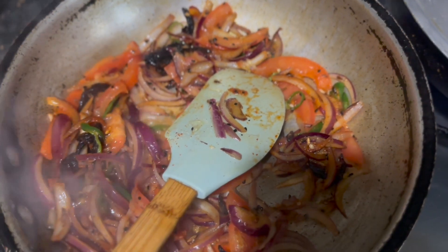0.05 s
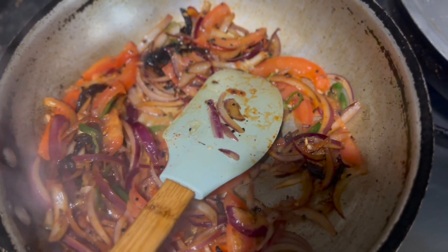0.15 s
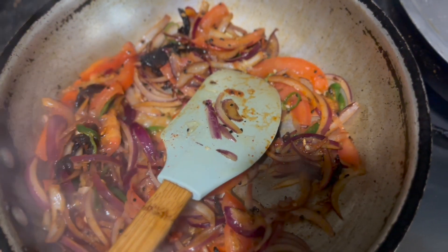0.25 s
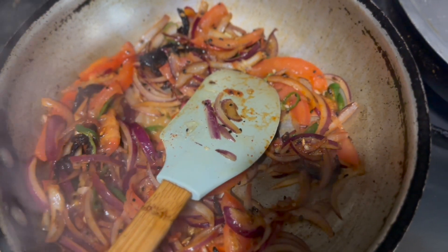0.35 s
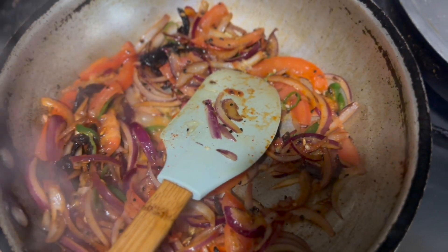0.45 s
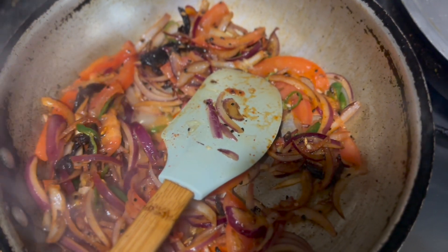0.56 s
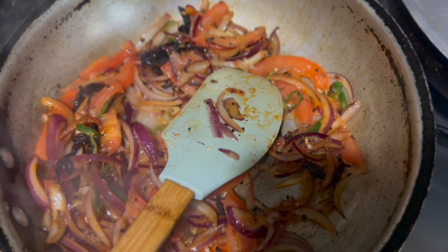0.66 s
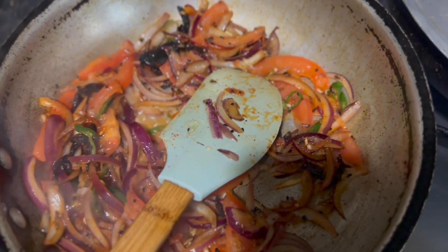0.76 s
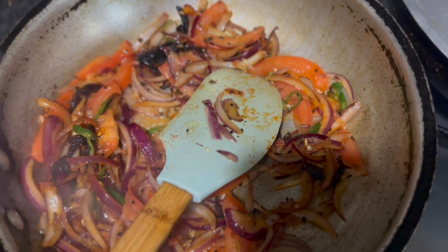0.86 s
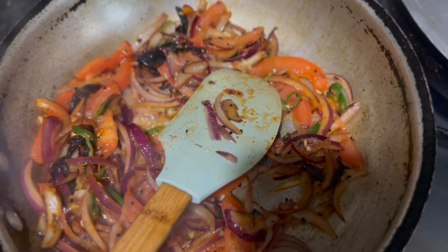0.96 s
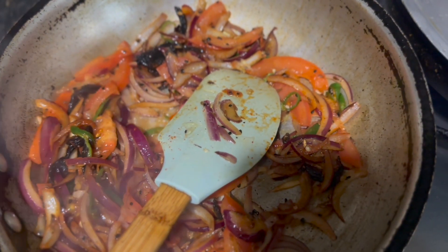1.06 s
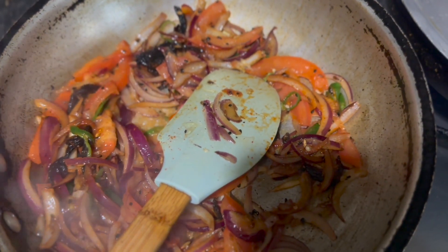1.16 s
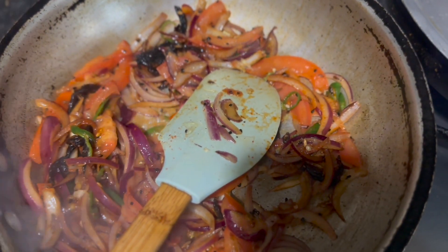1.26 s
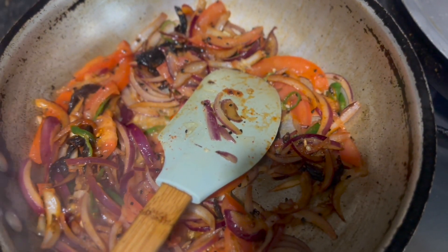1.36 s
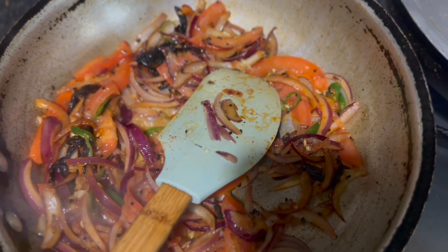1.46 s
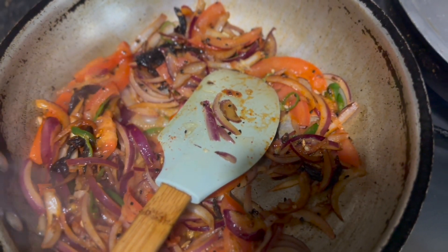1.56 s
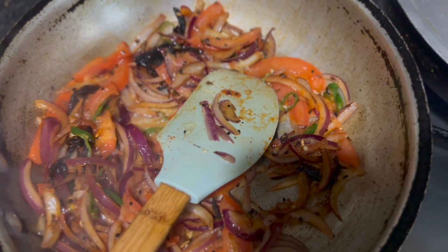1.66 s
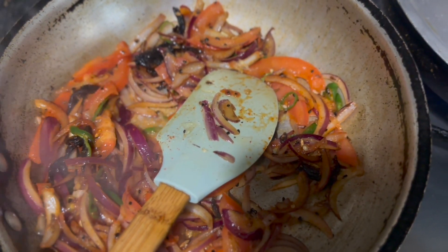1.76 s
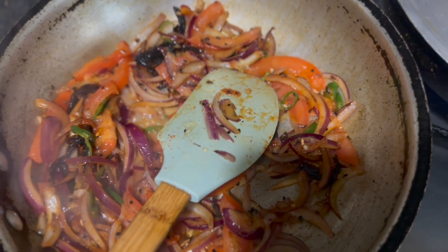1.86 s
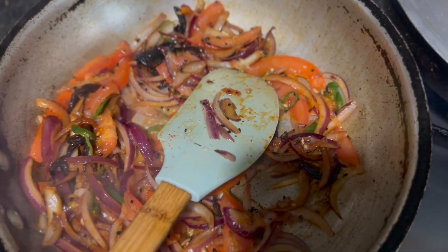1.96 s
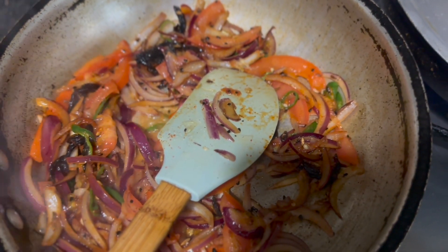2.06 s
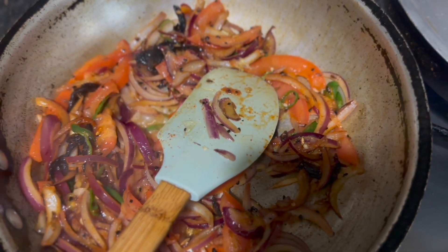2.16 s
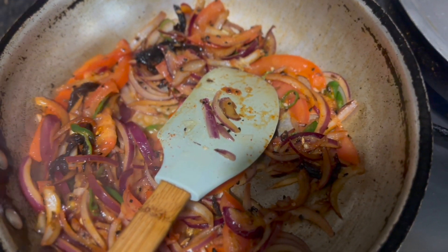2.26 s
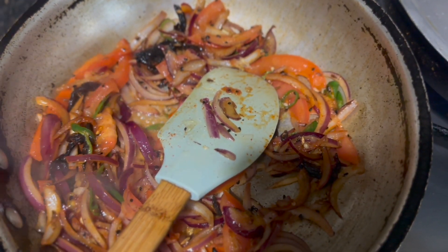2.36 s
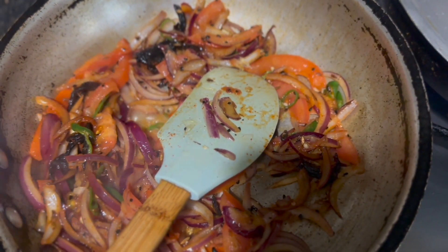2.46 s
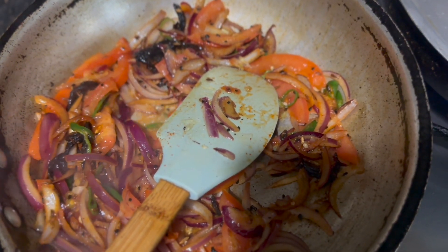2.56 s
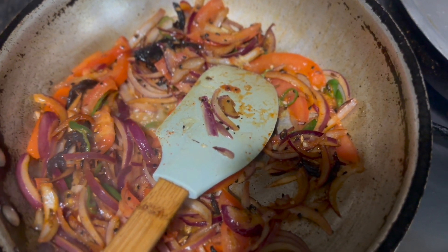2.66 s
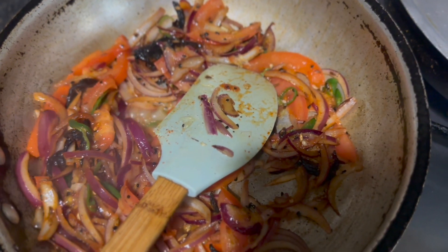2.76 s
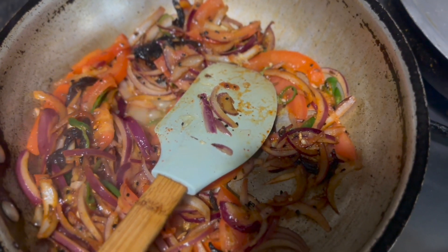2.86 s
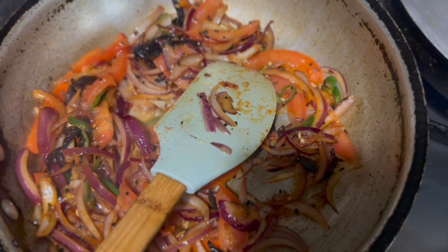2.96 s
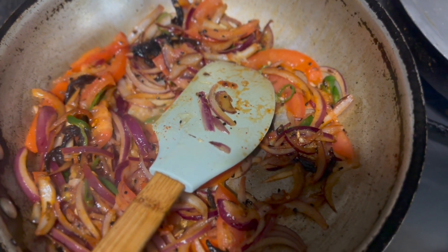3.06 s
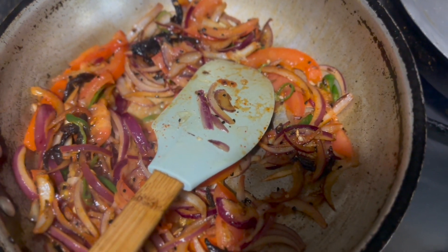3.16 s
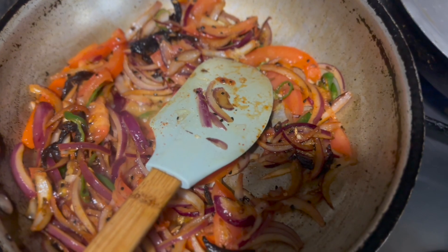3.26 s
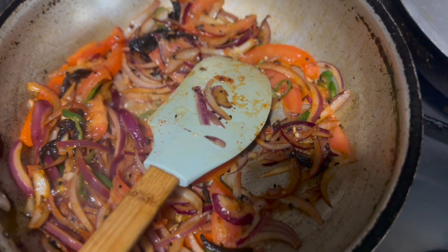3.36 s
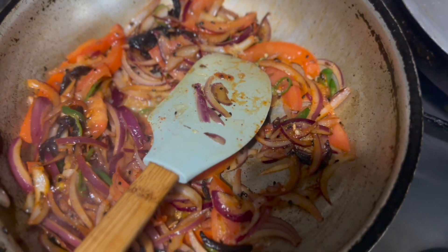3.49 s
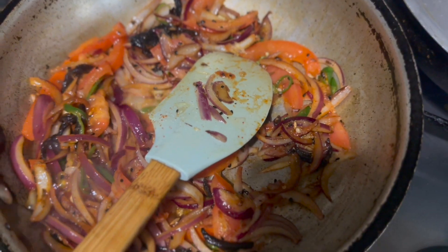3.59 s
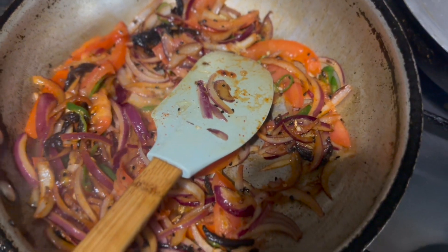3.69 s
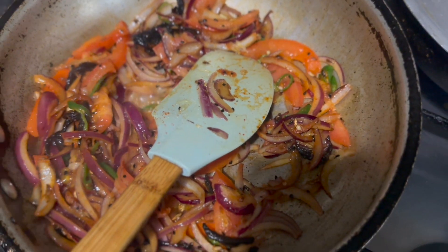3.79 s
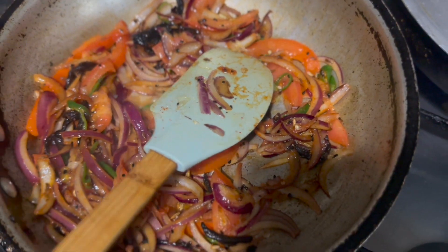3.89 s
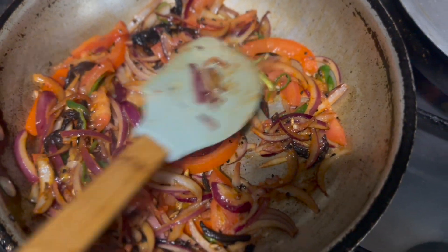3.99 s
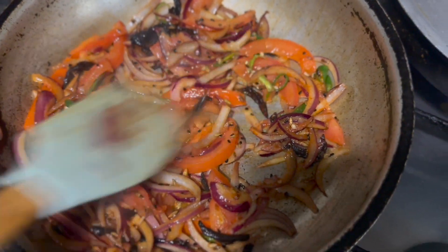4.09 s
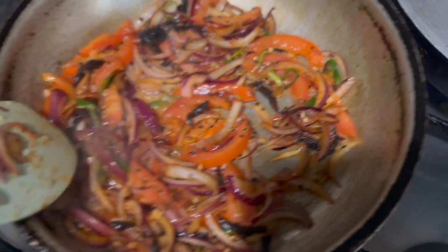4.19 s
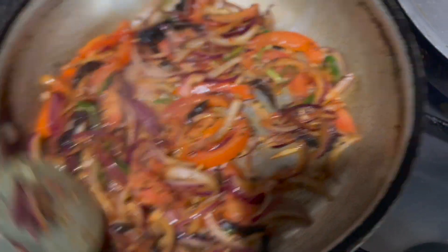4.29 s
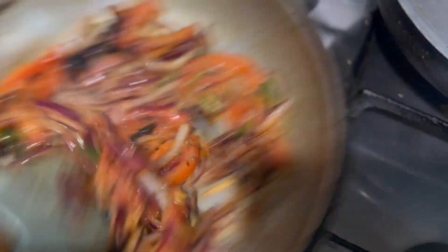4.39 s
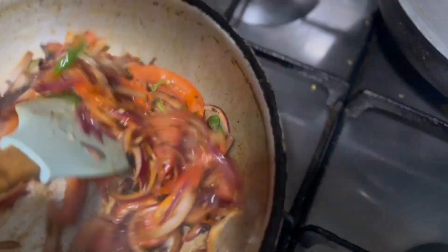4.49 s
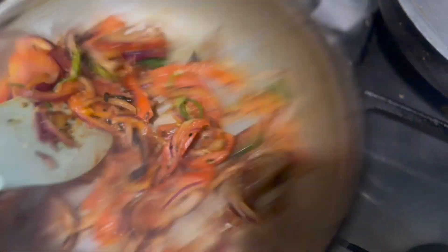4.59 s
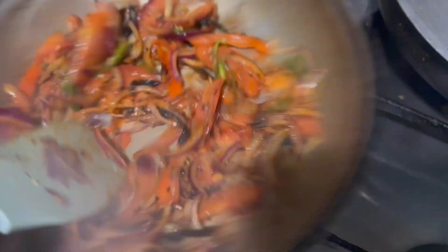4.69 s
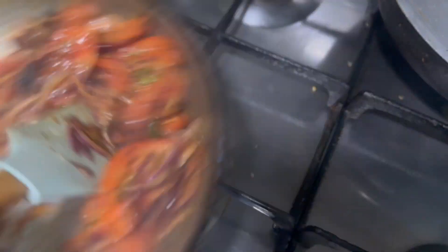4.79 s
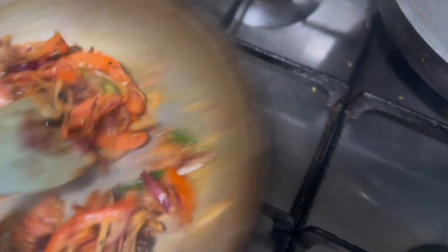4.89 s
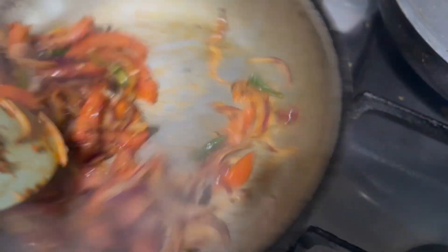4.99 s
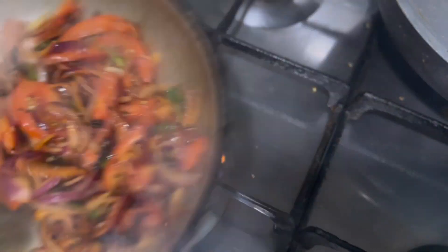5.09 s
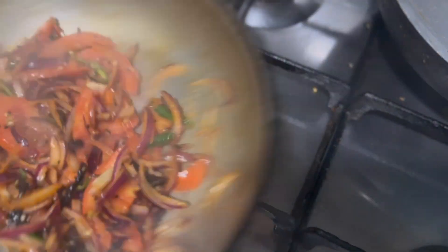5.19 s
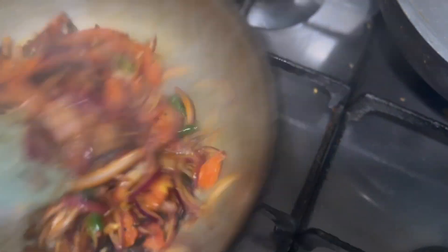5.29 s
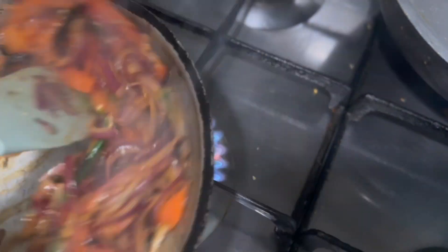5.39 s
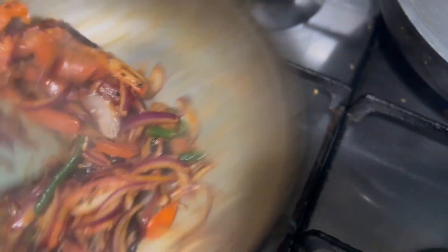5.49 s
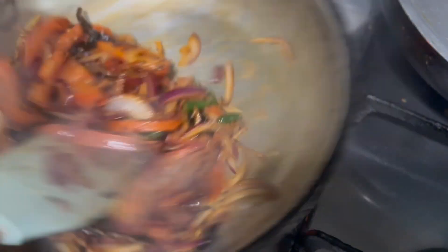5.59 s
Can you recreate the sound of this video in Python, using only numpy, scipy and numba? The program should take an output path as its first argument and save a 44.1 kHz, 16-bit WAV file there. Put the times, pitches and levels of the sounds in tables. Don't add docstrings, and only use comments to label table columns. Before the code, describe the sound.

Close, bright frying fizz with small cracking spits, faint handling bumps, and late on a burst of spatula scraping, knocking and pan rattling.

```python
import sys
import numpy as np
from scipy import signal
from scipy.fft import rfft, irfft
from scipy.io import wavfile
from scipy.ndimage import uniform_filter1d
from numba import njit

SR = 44100
rng = np.random.default_rng(int(sys.argv[2]) if len(sys.argv) > 2 else 0)


def to_wav(s):
    ch = np.atleast_2d(s).T
    pcm = np.round(np.clip(ch, -1, 1) * 32767)
    wavfile.write(sys.argv[1], SR, pcm.astype(np.int16))


def gain_from_db(level_db):
    decades = np.asarray(level_db, float) / 20
    return 10 ** decades


N = 248724
TIME = np.arange(N) / SR
HZ = np.fft.rfftfreq(N, 1 / SR)

# pitch_hz, level_db (per Hz), left_minus_right_db, shared_by_ports (0-1),
# left_lead_rad (by way of the pan wall)
FAT_COLOUR = [(663, -19, 19, 0.3, 1.1), (770, -2.5, 3.5, 1, 0.11), (1120, -6.5, -0.5, 0.65, 0.31),
              (2034, -3, -0.5, 0, 0.93), (2220, -2.5, -3, 0.56, 2.26), (3290, -0.5, -0.5, 0.35, 2.9),
              (4130, -2, 1.5, 0.47, 5.3), (4970, -1, 1.5, 0.28, 6.8), (6630, -4.5, 3.5, 0.02, 10.6),
              (7740, -4, 5.5, 0.7, 10.9), (8400, -3, 2.5, 1, 7.8), (11000, -1.5, -2, 1, 5.8),
              (12500, -6, 1, 1, 7.8), (16500, -12, -1, 1, 9.5)]
# start_s, boil_db, left_minus_right_db
BOIL_COURSE = [(0, -34.5, 3), (.8, -34.5, 3.5), (2.7, -35, 3), (3.6, -35.5, 5), (4.25, -34, 3.5),
               (4.43, -32, 7.5), (4.464, -29.5, 7), (4.616, -28.5, 8.5), (4.74, -26, 7), (4.76, -30.5, 13),
               (4.836, -29.5, 7.5), (4.896, -25, 9), (5.002, -29.5, 8.5), (5.086, -28, 10.5),
               (5.134, -33, 9.5), (5.178, -29.5, 8.5), (5.36, -31.5, 7.5), (5.56, -29, 9.5)]
# peak_s, extra_spray_db, rise_s (per 20 dB), fall_s (per 20 dB)
JUICE_SPURTS = [
    (4.24, 0, .1, .08),
    (4.46, 4, .04, 0),
    (4.555, 6, 0.3, 0.2),
    (4.785, 5, -1, 0.3),
    (5.18, 4, 1, 1.5),
    (5.62, 2, .5, -5),
]
# pitch_hz, width_hz, level_db
BOWL_MODES = [(940, 220, 5.5), (1310, 25, 10.5), (1391, 36, 14.5), (1534, 81, 8.5), (1785, 30, 10),
              (2096, 48, 9), (2797, 78, 3.5), (3705, 27, 9.5)]
# pitch_hz, width_hz, level_db
FLOOR_MODES = [(290, 41, 1.5), (340, 100, 0), (479, 24, 2.5), (560, 105, -0.5), (691, 45, 5.5),
               (776, 79, 0.5), (1020, 75, -2.5), (1150, 210, -23)]
# pitch_hz, width_hz, level_db
RIM_MODES = [(1344, 40, -1.5), (1550, 47, -7), (1780, 51, -5), (2310, 92, 4), (3100, 90, -7.5),
             (3710, 28, 1.5), (4470, 63, -3)]
# peak_s, pressure_db, brightness_db, rise_s (per 20 dB), fall_s (per 20 dB)
STROKE_EVENTS = [(4.38, -43, 9, -0.2, 0.4), (4.415, -30.5, -0.5, 0.08, 0.06), (4.58, -40, -11, 0.5, -5.5),
                 (4.61, -25.5, -1, .01, 0.2), (4.65, -30, 0.5, 0.1, 0.2), (4.72, -33, 4, .03, 0.2),
                 (4.798, -29, 1.5, 0.1, 0.2), (4.947, -26.5, 0.5, 0.11, .1), (5.106, -26, 2, 0, -0.36),
                 (5.162, -39.5, 3.5, 0.2, 0.1), (5.195, -39, -13, -0.5, 1),
                 (5.23, -29.5, -3.5, 0.25, -0.24), (5.32, -35, 2, -0.14, .1),
                 (5.345, -30, 4.5, -0.03, 0.17), (5.372, -29, 5.5, 0.05, 0.06), (5.46, -34, 6.5, 0, -0.07),
                 (5.496, -34.5, 8.5, 0.07, 0.1)]
# pitch_hz, then rows of peak_s, level_db, fall_s (per 20 dB)
WALL_SONGS = [
    (1756, [(4.604, -38, 1), (4.764, -36, .3), (4.81, -30, -2), (4.905, -26, .04), (5.11, -27, -1.1), (5.18, -34, -1.2), (5.325, -36, 0.3), (5.385, -32, .03), (5.475, -31.5, 0.2)]),
    (2310, [(4.604, -42, 0), (4.66, -39, .05), (4.822, -29, -0.26), (4.91, -35, 0.4), (5.11, -38, -1.5), (5.18, -47, -2), (5.368, -38, 0), (5.456, -38, 0)]),
]
# start_s, level_db (peak), pitch_hz, t60_s
FLOOR_KNOCKS = [(4.325, -43, 970, 0.028), (4.37, -45, 670, 0.035), (4.403, -21, 678, 0.087),
                (4.46, -25.5, 755, 0.039), (4.565, -23.5, 500, 0.07), (4.6072, -9.5, 697, 0.025),
                (4.611, -31, 483, 0.039), (4.95, -18, 484, 0.077), (4.96, -19.5, 790, 0.021),
                (4.707, -24, 714, 0.14), (4.765, -17.5, 487, 0.012), (4.789, -15.5, 710, 0.017),
                (4.886, -22, 745, 0.029), (5.101, -20, 463, 0.04), (5.161, -23, 696, 0.032),
                (5.276, -35, 407, 0.035), (5.312, -16.5, 560, 0.033), (5.338, -19, 620, 0.047),
                (5.453, -22, 670, 0.042), (5.485, -19.5, 500, 0.045), (5.55, -23.5, 1150, 0.032)]
# start_s, level_db (peak), pitch_hz, t60_s
RIM_TICKS = [(4.407, -38, 3640, 0.025), (4.6069, -24, 3710, 0.025), (4.6433, -13, 3680, 0.025),
             (4.6568, -9, 3750, 0.017), (4.7198, -12.5, 1570, 0.013), (4.7763, -18, 3100, 0.03),
             (4.7894, -26, 2340, 0.025), (4.806, -17, 2310, 0.072), (4.8966, -18, 1800, 0.029),
             (4.9744, -21, 1970, 0.022), (5.0994, -17, 1780, 0.023), (5.1137, -21, 1690, 0.025),
             (5.1696, -25, 3440, 0.025), (5.1907, -17.5, 3100, 0.02), (5.3183, -29, 1670, 0.027),
             (5.3494, -32, 3100, 0.025), (5.365, -29, 1730, 0.031), (5.4586, -20, 1710, 0.028),
             (5.477, -19, 2500, 0.021), (5.5483, -16.5, 1480, 0.028)]
# start_s, level_db (peak), pitch_hz, t60_s
RIM_CLINKS = [
    (4.6069, -20, 3710, 0.018),
    (4.6568, -4.5, 4430, 0.02),
    (4.7184, -11.5, 4970, 0.013),
    (5.5474, -14, 4470, 0.02),
    (4.608, -15, 2800, 0.023),
    (4.658, -27, 4470, .03),
    (5.549, -16, 2640, 0.032),
]
# start_s, level_db (peak), pitch_hz, t60_s
GRATE_THUDS = [(0.449, -37, 185, 0.11), (0.531, -28.5, 189, 0.095), (0.546, -33, 140, 0.065),
               (0.553, -28.5, 98, 0.062), (.585, -38, 95, 0.14), (0.889, -37, 407, 0.09),
               (.9, -41, 467, .1), (.893, -43, 170, .08), (2.099, -36.5, 181, 0.14),
               (2.172, -33.5, 88.8, 0.19), (2.469, -34, 123, 0.09), (2.56, -39.5, 104, 0.19),
               (3.265, -34.5, 115, 0.11), (3.725, -35, 102, 0.1), (4.01, -34, 121, 0.11),
               (4.214, -32, 266, 0.05), (4.355, -27, 115, .06), (4.412, -19, 129, 0.1),
               (4.62, -9.5, 148, 0.045), (4.667, -11, 89.5, 0.047), (4.724, -13, 108, 0.077),
               (4.898, -17.5, 86.5, 0.065), (5.11, -11.5, 113, 0.035), (5.319, -21, 127, 0.07),
               (5.386, -16.5, 141, 0.091), (5.468, -19.5, 107, 0.076), (5.497, -17.5, 155, 0.17),
               (5.561, -9.5, 116, 0.064)]
# peak_s, level_db (peak), rocking_pitch_hz, fall_s (per 20 dB)
HAND_NUDGES = [(0, -42, 112, .22), (.47, -42.5, 87, 0), (.55, -29, 110, 0), (.83, -55, 117, 1.5),
               (.91, -50, 94, -1), (1.03, -46, 82, -5.5), (1.3, -57, 96, 1), (1.51, -42, 95, 0.04),
               (1.74, -45, 91, -1), (1.99, -47, 98, -3), (2.09, -44, 115, 0.8), (2.19, -40, 85, 0.35),
               (2.48, -43.5, 112, -0.3), (2.58, -47, 104, -1.5), (2.68, -51, 90, 1.5),
               (2.95, -53.5, 104, 10), (3.27, -36, 115, 0), (3.34, -40, 103, 0.2), (3.47, -47.5, 106, 0.5),
               (3.66, -43, 98, -0.5), (3.82, -37.5, 98, -1.2), (3.89, -45.5, 97, 3), (4.02, -41, 89, 0.5),
               (4.14, -48, 96, 2.5)]
# peak_s, level_db (peak), rocking_pitch_hz, rise_s (per 20 dB), fall_s (per 20 dB)
PAN_SHOVES = [(4.366, -27.5, 113, .07, -0.5), (4.388, -26.5, 108, 0.01, .06), (4.437, -26, 125, 0.03, .08),
              (4.478, -27.5, 110, 0.08, .07), (4.528, -35, 105, 0, 0), (4.578, -26.5, 100, 0, 0.5),
              (4.648, -21, 120, 0, 0.2), (4.702, -23, 105, 0.04, 0), (4.768, -22.5, 103, 0.13, 0.2),
              (4.8, -25, 120, 0.06, 0.05), (4.836, -20.5, 128, 0.12, .04), (4.914, -24, 112, .06, 0.24),
              (4.95, -24.5, 126, 0.12, .12), (5.015, -24.5, 120, .04, -0.1), (5.045, -33.5, 110, 0.4, .06),
              (5.145, -20.5, 125, .1, -0.2), (5.188, -24.5, 152, 0.16, -0.1), (5.21, -23, 136, -0.02, .12),
              (5.24, -22.5, 153, 0.22, 0), (5.29, -38, 120, .1, -1), (5.352, -22.5, 140, .06, 0.2),
              (5.372, -20, 120, 0.03, -0.3), (5.405, -23, 130, .1, 0), (5.525, -23.5, 145, 0.34, 0.3),
              (5.59, -23.5, 124, .1, 0), (5.612, -27, 115, -0.4, -0.8)]
# pitch_hz, level_db (per Hz)
FLAME_COLOUR = [(15, -39), (25, -22), (43, -4.5), (98, -1.5), (211, -17.5), (254, -12.5), (302, -9.5),
                (333, -7.5), (379, -8.5), (632, -14), (750, -15.5), (980, -35), (1650, -120)]

TOP_HZ = 15800
EVENNESS = 0.57


def sizzle():
    boil_db, pan_db = curves(BOIL_COURSE)
    stirred_db = boil_db - boil_db[0]
    squeeze = np.tanh(gain_from_db(glide(pressure()[1], 0.033) + 35.5))
    spread_out = np.clip((TIME - 4.55) / .5, 0, 1)
    drying_db = -0.48 * TIME
    splutter_db = boil_db[0] - 1.5 + drying_db + 0.79 * stirred_db + 2.5 * squeeze + 1.2 * spread_out
    spurt_db = swells(*np.transpose(JUICE_SPURTS), floor_db=-0.5)[0]
    spray_db = boil_db[0] + 0.9 + 0.92 * stirred_db + 0.68 * walk(9) + spurt_db

    small = np.sqrt(1 / (1 + (6800 / (HZ + 1)) ** 7.1))
    tiny = np.sqrt(1 / (1 + (13300 / (HZ + 1)) ** 43))
    large = np.sqrt(1 - small ** 2) / np.sqrt(1 + (700 / (HZ + 1)) ** 6)
    straight = -2 * np.pi * HZ * 3.72 / SR
    by_wall = on_log_hz(*np.array(FAT_COLOUR)[:, [0, 4]].T)

    fizz = fat(small * np.sqrt(1 - tiny ** 2), straight, share=.6, spread_db=1.0, flicker_db=0.51)
    spray = fat(tiny * (HZ < TOP_HZ), straight, share=.7, spread_db=0.74, flicker_db=.35)
    splutter = fat(large, by_wall, share=.3, spread_db=0.5, flicker_db=0.48)
    bowl = fat(large * modes(BOWL_MODES), by_wall, share=.03, spread_db=2.56, flicker_db=0.96)
    lean_db = np.array([pan_db, -pan_db]) / 2
    bowl_db = -40.5 + 0.46 * np.minimum(splutter_db - splutter_db[0], 0) + np.array([[1.8], [-1.8]])
    bubbles = fizz * gain_from_db(boil_db + 6.0) + spray * gain_from_db(spray_db)
    return bubbles + splutter * gain_from_db(splutter_db + 5.0 + lean_db) + bowl * gain_from_db(bowl_db)


def fat(colour, lead, share, spread_db, flicker_db):
    hz, db, pan_db, common, _ = np.transpose(FAT_COLOUR)
    db, pan_db = on_log_hz(hz, db), on_log_hz(hz, pan_db)
    common = on_log_hz(hz, np.clip(common, 0, .7))
    boil = gain_from_db(flicker_db * walk(40))
    both, left, right = (rfft(boil * bursts(share, spread_db)) for _ in range(3))
    left = np.sqrt(common) * both * np.exp(1j * lead) + np.sqrt(1 - common) * left
    right = np.sqrt(common) * both + np.sqrt(1 - common) * right
    ports = np.array([left * gain_from_db(pan_db / 2), right * gain_from_db(-pan_db / 2)])
    return unit(irfft(colour * gain_from_db(db) * ports, N))


def spits():
    boil_db = curves(BOIL_COURSE)[0]
    droplets = through(bursts(share=.001, spread_db=1.0), modes([(9500, 9000, 0)]))
    return place(unit(droplets) * gain_from_db(-47 + boil_db - boil_db[0]), 1.5, .4, 6000)


def spatula():
    low_db, high_db = pressure()
    knocks = rings(FLOOR_KNOCKS, rise=0.07, late=0.36) * gain_from_db(-1.0)
    ticks = rings([*RIM_TICKS, *RIM_CLINKS], rise=0.42, late=.6) * gain_from_db(-5.5)
    bounce = np.roll(envelope(knocks, 0.0217), -int(0.0079 * SR))
    landed = np.clip((TIME - STROKE_EVENTS[0][0] + .13) / 0.081, 0, 1)
    down = landed / (1 + (1.04 * bounce / gain_from_db(high_db)) ** 2)

    slips = bursts(share=.04, spread_db=1.4) * gain_from_db(1.9 * walk(45))
    blows = cracks(FLOOR_KNOCKS, 0.0068)
    low = shaken(FLOOR_MODES[:3], slips, down * gain_from_db(low_db), blows * gain_from_db(-8.0))
    high = shaken(FLOOR_MODES[3:], slips, down * gain_from_db(high_db - 2.4), blows * gain_from_db(-7.0))
    rim = shaken(RIM_MODES, slips, down * gain_from_db(high_db - 10), cracks(RIM_TICKS, 0.0036) * gain_from_db(-10.5))
    scuff = svf(blows * gain_from_db(-6.0) + slips * down * gain_from_db(high_db - 6), steady(2500.0), 0.35)
    bright = rim + ticks + singing(slips) + scuff
    return place(low, 1.5, 0.48, 600) + place(high + knocks, 6.2, 1.1, 540) + place(bright, 5.1, 1.0, 1200)


def singing(slips):
    song = np.zeros(N)
    for hz, rows in WALL_SONGS:
        s, db, fall = np.transpose(rows)
        tone = evened(through(slips, modes([(hz, 42, 0)])), 0.0071, EVENNESS)
        song += tone * gain_from_db(swells(s, db - 3.0, 0.048, fall)[0])
    return song


def pressure():
    s, db, bright_db, rise, fall = np.transpose(STROKE_EVENTS)
    return swells(s, db, rise, fall)[0], swells(s, db + bright_db, rise, fall * 0.61)[0]


def shaken(table, slips, touch, blows):
    response = modes(table)
    dragged = through(slips, response)
    struck = through(blows, response) / np.std(dragged)
    return evened(dragged, 0.0115, EVENNESS) * glide(touch, 0.0071) + struck


def rumble():
    nudges = np.insert(HAND_NUDGES, 3, 0.059, axis=1)
    s, db, hz, rise, fall = np.vstack([nudges, PAN_SHOVES]).T
    level_db, which = swells(s, db, rise, fall, floor_db=-66)
    hz = glide(hz[which], 0.028)
    pushes = rng.standard_normal(N) * gain_from_db(1.6 * walk(25.3))
    rocking = evened(svf(svf(pushes, hz, 7.6), hz, 1.0), 0.0098, EVENNESS)
    boom = evened(svf(svf(pushes, steady(72.0), 1.2), steady(72.0), 1.2), 0.026, EVENNESS)

    thuds = rings(GRATE_THUDS, rise=0.34, late=0.36)
    near_thud = np.roll(envelope(thuds, 0.025), -int(0.0083 * SR))
    free = gain_from_db(level_db - 0.5) / (1 + (2.0 * near_thud / gain_from_db(level_db)) ** 2)
    blows = cracks(np.array(GRATE_THUDS)[:, :2] * [1, .75], 0.018)
    rattle = svf(blows, steady(280.0), 0.73) * gain_from_db(-2.0)
    return late_left((rocking + gain_from_db(-4.5) * boom) * free + thuds + rattle, pan_db=1.0)


def flame():
    flutter = gain_from_db(1.3 * walk(13))
    colour = gain_from_db(on_log_hz(*np.transpose(FLAME_COLOUR)))
    mid, side = (through(rng.standard_normal(N) * flutter, colour) for _ in range(2))
    side = through(side, np.clip(HZ / 900, 0, 1))
    return unit(mid + side * np.array([[1], [-1]])) * gain_from_db(-47.5 + np.array([[.8], [-.8]]))


def bursts(share, spread_db):
    chance, size, sign = rng.random(N), rng.exponential(size=N), rng.standard_normal(N)
    return unit((chance < share) * sign * gain_from_db(spread_db * size))


def cracks(events, length_s):
    out, t = np.zeros(N + SR), np.arange(SR // 20) / SR
    for s, db, *_ in events:
        i = int(s * SR)
        out[i:i + len(t)] += gain_from_db(db) * rng.standard_normal(len(t)) * np.exp(-t / length_s)
    return out[:N]


def rings(events, rise, late):
    out, t = np.zeros(N + SR), np.arange(SR // 3) / SR
    for s, db, hz, t60 in events:
        decay = np.exp(-np.log(1000) * t / max(t60, .005))
        shape = (1 - np.exp(-t * hz / rise)) ** 2 * decay
        i = int((s + late / hz) * SR)
        out[i:i + len(t)] += gain_from_db(db) * shape / shape.max() * np.sin(2 * np.pi * hz * t)
    return out[:N]


def modes(table):
    response = 0
    for k, (f, w, db) in enumerate(table):
        response = response + (-1) ** k * gain_from_db(db) * 1j * HZ * w / (f ** 2 - HZ ** 2 + 1j * HZ * w)
    return response


def through(x, response):
    return irfft(rfft(x) * response, N)


@njit
def svf(x, hz, sharp):
    y, b, l, k = np.empty(len(x)), 0., 0., 1 / sharp
    for i in range(len(x)):
        g = np.tan(np.pi * hz[i] / SR)
        v = (b + g * (x[i] - l)) / (1 + g * (g + k))
        b, l, y[i] = 2 * v - b, l + 2 * g * v, k * v
    return y


def steady(hz):
    return np.full(N, hz)


def evened(x, length_s, evenness):
    return unit(x / (envelope(x, length_s) + .1 * np.std(x)) ** np.clip(evenness, 0, 1))


def swells(s, db, rise_s, fall_s, floor_db=-70):
    s, db, rise_s, fall_s = (np.reshape(v, (-1, 1)) for v in (s, db, rise_s, fall_s))
    t = TIME[::32]
    late = t - s
    slope = np.where(late < 0, -1 / rise_s.clip(.01), 1 / fall_s.clip(.01))
    each = db - 20 * slope * late
    level_db = np.interp(TIME, t, each.max(axis=0).clip(floor_db))
    return level_db, np.repeat(each.argmax(axis=0), 32)[:N]


def walk(rate):
    k = int(SR / rate)
    held = np.repeat(rng.standard_normal(N // k + 1), k)
    return unit(uniform_filter1d(uniform_filter1d(held, k), k)[:N])


def glide(values, length_s):
    return uniform_filter1d(values, int(length_s * SR))


def envelope(x, length_s):
    return np.sqrt(uniform_filter1d(x ** 2, int(length_s * SR)).clip(0))


def unit(x):
    return x / np.sqrt(np.mean(x ** 2))


def curves(rows):
    s, *columns = np.transpose(rows)
    return [np.interp(TIME, s, c) for c in columns]


def on_log_hz(hz, values):
    return np.interp(np.log(HZ + 1), np.log(hz), values)


def place(x, pan_db, spread, wide_hz):
    tail = rng.standard_normal(1800) * np.exp(-np.arange(1800) / 220)
    scatter = 1.4j * rfft(tail / np.linalg.norm(tail), N).imag
    side = through(x, scatter * np.clip(HZ / wide_hz, 0, 1))
    ports = x + spread * side * np.array([[1], [-1]])
    return ports * gain_from_db(np.array([[pan_db], [-pan_db]]) / 2) / np.sqrt(1 + 0.18 * spread ** 2)


def late_left(x, pan_db):
    turn = np.exp(-1j * np.pi * HZ * 0.00032)
    return np.array([through(x, turn) * gain_from_db(pan_db / 2), through(x, turn.conj()) * gain_from_db(-pan_db / 2)])


def scene():
    return sizzle() + spits() + spatula() + rumble() + flame()


def band_limit(x):
    return signal.sosfilt(signal.butter(12, 16090, fs=SR, output="sos"), x)


def record(dry):
    mid, side = rfft(dry[0] + dry[1]) / 2, rfft(dry[0] - dry[1]) / 2
    side = side * ((HZ < 10450) | (HZ > 13450))
    microphone = (HZ < TOP_HZ) / np.sqrt(1 + (42 / (HZ + 1)) ** 4)
    mix = irfft(microphone * np.array([mid + side, mid - side]), N)
    return band_limit(mix)


dry = scene()
out = record(dry)
to_wav(out)
```